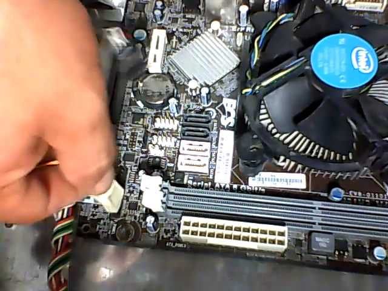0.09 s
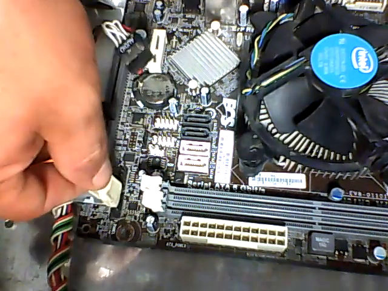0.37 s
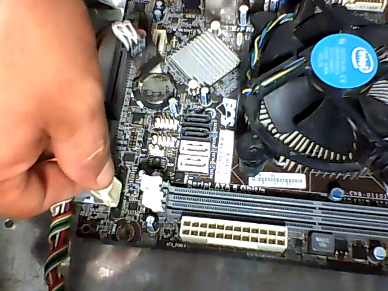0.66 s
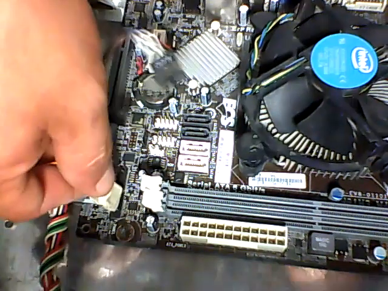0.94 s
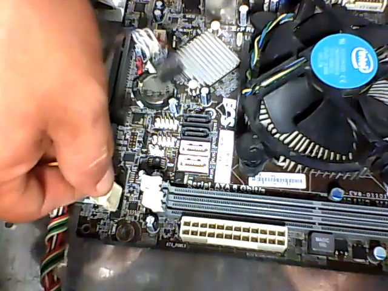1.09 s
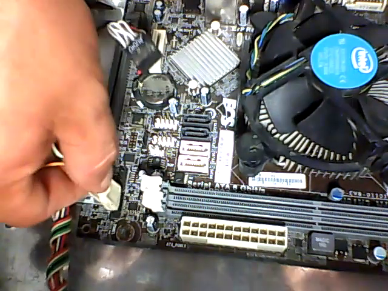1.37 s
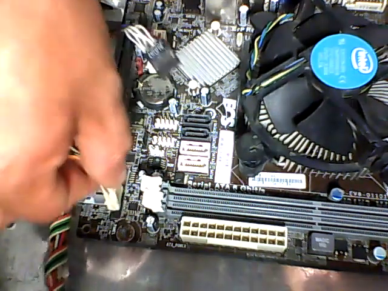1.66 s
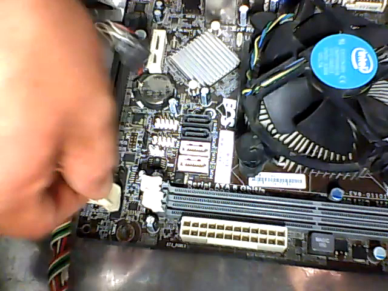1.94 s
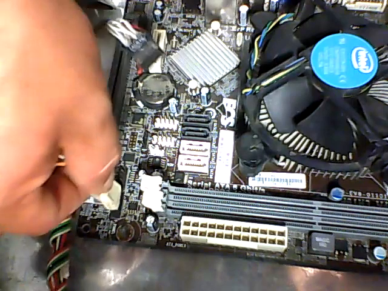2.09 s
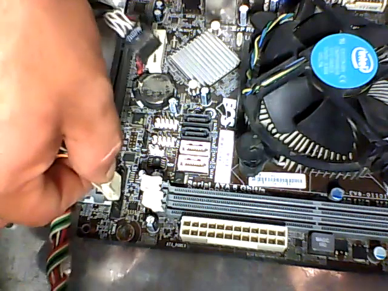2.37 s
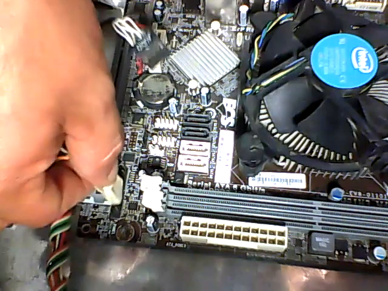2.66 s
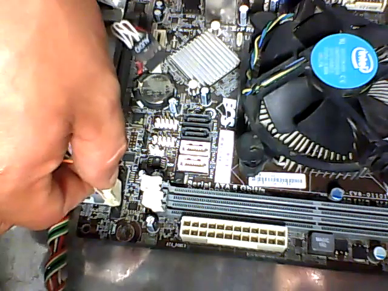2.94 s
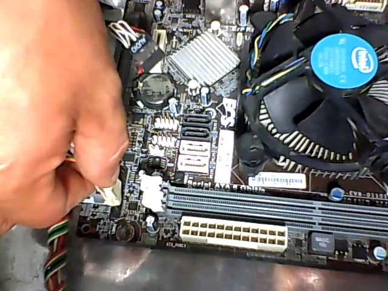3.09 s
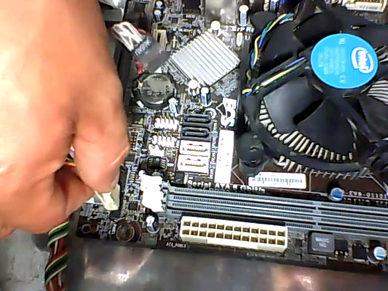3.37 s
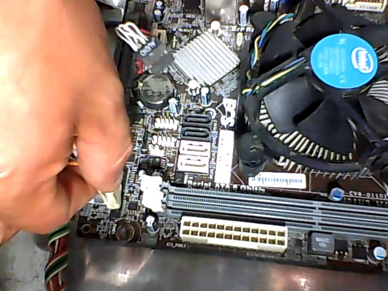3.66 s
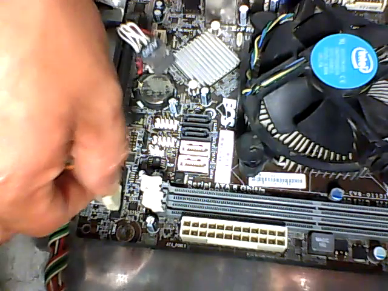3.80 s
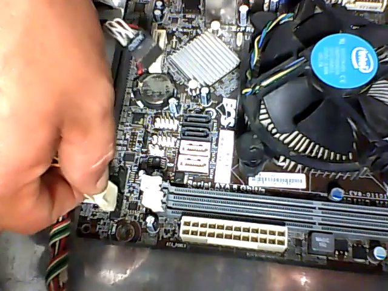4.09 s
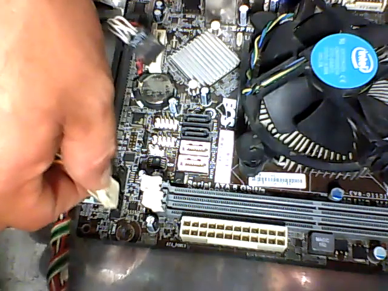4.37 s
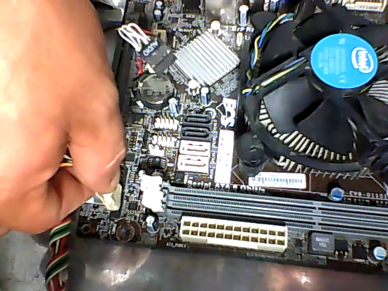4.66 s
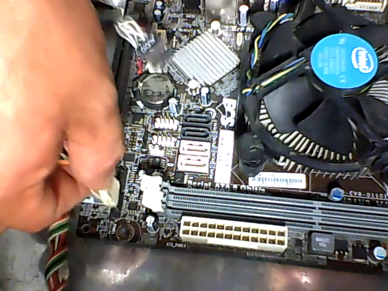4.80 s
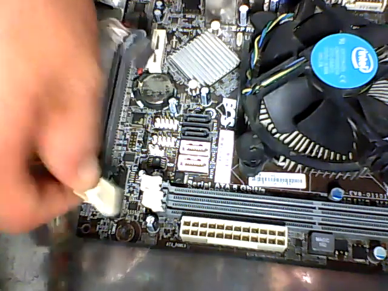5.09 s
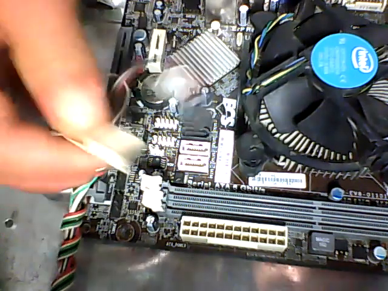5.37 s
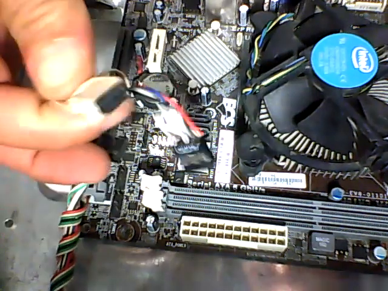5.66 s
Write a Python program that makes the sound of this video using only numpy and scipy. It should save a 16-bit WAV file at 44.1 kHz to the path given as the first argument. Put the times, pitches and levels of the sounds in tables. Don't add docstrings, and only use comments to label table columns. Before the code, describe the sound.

Very close, dry handling noise in a small room, through a cheap microphone. From start to end a thin pair of high electronic whines flutters rapidly, about fifteen pulses a second, with a low electrical buzz, soft hiss and dull building rumble. Small clicks and board taps open at 0 seconds; a sharper click with metallic ring and hollow knocks follows at 0.25-0.45. A light tick comes at 1.0, then a strong plasticky clack with low thud at 1.3 and little scrapes to 1.5. Isolated knocks sound at 2.06, 2.35, 2.65 and a double at 2.85; lighter ones at 3.3 and 3.6. The loudest clatter, bright and ringing, lands at 3.9-4.07, as a faint distant engine drone rises and stays. After a mostly quiet gap, clicks, knocks and dry wire rustles crowd together from 5.1 to 5.6, with heavier low rumble as the hand lifts.

```python
import sys
import numpy as np
from scipy import signal
from scipy.fft import rfft, irfft
from scipy.io import wavfile
from scipy.ndimage import uniform_filter1d

SR = 44100
rng = np.random.default_rng(int(sys.argv[2]) if len(sys.argv) > 2 else 0)


def to_linear_factor(level_db):
    exponent = np.asarray(level_db, float) / 20
    return 10 ** exponent


def to_wav(sig):
    pcm = np.clip(np.atleast_2d(sig), -1, 1) * 32767
    pcm = np.round(pcm).astype(np.int16)
    wavfile.write(sys.argv[1], SR, pcm.T)


N = 250223
TIME = np.arange(N) / SR


def band(x, lo_hz, hi_hz, order=2):
    return signal.sosfilt(signal.butter(order, [lo_hz, min(hi_hz, SR / 2.2)], "bandpass", fs=SR, output="sos"), x)


def unit(x):
    return x / np.sqrt(np.mean(x ** 2))


def loud(x):
    return x / np.sqrt(uniform_filter1d(x ** 2, 220).max())


def walk(rate):
    k = int(SR / rate)
    steps = np.repeat(rng.standard_normal(N // k + 1), k)
    return 1.363 * uniform_filter1d(uniform_filter1d(steps, k), k)[:N]


def hold(start_s, length_s, attack_s, release_s, sag_db):
    corners = np.cumsum([start_s - attack_s, attack_s, length_s, release_s])
    db = np.interp(TIME, corners, [-25, 0, sag_db, sag_db - 25])
    return to_linear_factor(db) * (db > min(sag_db, 0) - 25) * (TIME > start_s - attack_s)


def near_pitch(modes, hz, db_per_octave):
    return [(f, db - db_per_octave * abs(np.log2(f / hz)), t60) for f, db, t60 in modes]


def ring(modes, push, luck, scatter_db=1.5):
    t = np.arange(len(push)) / SR
    body = sum(to_linear_factor(db + scatter_db * g) * np.sin(2 * np.pi * hz * t) * 1000. ** (-t / t60)
               for (hz, db, t60), g in zip(modes, luck))
    return loud(signal.fftconvolve(body, push)[:len(push)])


def blows(table, sound):
    size = 8192
    t = np.arange(size) / SR
    out = np.zeros(N + size)
    for s, *row in table:
        i = int(s * SR)
        noise, luck = rng.standard_normal((3, size)), rng.standard_normal(12)
        out[i:i + size] += sound(t, noise, luck, *row)
    return out[:N]


# f/Hz, level/dB, t60/s
TRAY_MODES = [(4680, -6, .05), (4800, -4, .05), (4877, -1, .07), (4990, -2, .055), (5110, -3, .055),
              (5240, -4, .05), (5356, -2, .055), (5459, 0, .065), (5600, -4, .045), (6100, -4, .03),
              (6780, -3, .03), (6900, -4, .025)]


def click(t, noise, luck, plug_db, plug_hz, crack_db, tray_db, tray_hz):
    chatter = noise[0] * abs(noise[0]) ** .5 * (np.exp(-t / 0.0035) + 0.18 * np.exp(-t / 0.011))
    parts = noise[1] * (np.exp(-t / 0.0051) + 0.32 * np.exp(-t / 0.021))
    tray_push = noise[2] * (np.exp(-t / .003) + .3 * np.exp(-t / .018))
    plug_modes = [(plug_hz, 0, .014), (1.07 * plug_hz, -4, .012), (1.35 * plug_hz, -8, .008)]
    plug = ring(plug_modes, chatter, luck) + 0.97 * loud(band(parts, 1160, 4200))
    tray = ring(near_pitch(TRAY_MODES, tray_hz, 58), tray_push, luck) + 0.4 * loud(band(parts, 4000, 7000))
    crack = loud(band(chatter, 7500, 16500))
    return to_linear_factor(crack_db + 3) * crack + to_linear_factor(plug_db - 7.5) * loud(plug) + to_linear_factor(tray_db - 3.5) * loud(tray)


# t/s, plug level/dB, plug f/Hz, latch crack level/dB, tray ring level/dB
SEATINGS = [(0.0118, -33, 2770, -56, -57), (0.023, -46, 2630, -40, -58), (0.0661, -34, 2290, -55, -54),
            (0.2484, -25, 3880, -28.5, -29.5), (1.0102, -44, 3200, -48, -45), (1.306, -18, 1860, -28, -43),
            (1.3171, -33, 1700, -43, -51), (1.418, -31.5, 2100, -43, -53), (1.464, -36.5, 1710, -42, -53),
            (2.3434, -21, 2810, -27, -27), (2.8459, -31, 2630, -51, -46),
            (2.872, -23.5, 2230, -29.5, -26.5), (3.2975, -37.5, 4130, -33, -43),
            (3.5921, -23.5, 2500, -37.5, -38), (3.878, -35, 1730, -56, -57),
            (3.9696, -16, 2190, -31, -28.5), (4.0065, -32, 2570, -35, -27.5),
            (4.0134, -31, 2290, -33.5, -33), (5.243, -27.5, 2350, -38, -53), (5.322, -39, 2560, -44, -47),
            (5.4613, -40, 4380, -53, -44)]
GRAZES = [(0.2654, -21.5, 2070, -30, -29.5), (0.2744, -30, 2980, -50, -53), (0.4436, -35, 1640, -50, -53),
          (0.71, -49, 2230, -42, -55), (1.035, -35, 2550, -49, -44), (2.0625, -39, 2170, -57, -57),
          (2.6398, -39, 2280, -48, -35), (5.1545, -26, 1740, -33, -48), (5.2122, -40, 1600, -34, -52)]
TRAY_MIDDLE_HZ, TRAY_RIM_HZ = 4930, 6850


def plug_clicks():
    middle = [(*row, TRAY_MIDDLE_HZ) for row in SEATINGS]
    rim = [(*row, TRAY_RIM_HZ) for row in GRAZES]
    return blows(middle + rim, click)


# f/Hz, level/dB, t60/s
BOARD_MODES = [(740, -2, 0.13), (815, 5, 0.051), (886, -2.5, 0.072), (937, -8, 0.098), (999, 1, 0.14),
               (1069, 2.5, 0.1), (1117, 0, 0.084)]
# f/Hz, level/dB, t60/s
EDGE_MODES = [(1210, -6, 0.034), (1330, -1, 0.029), (1405, -5, 0.04), (1460, -3, 0.084)]


def knock(t, noise, luck, db, hz, contact_ms, thud_db, edge_db):
    swell = 1 - np.exp(-t * 1000 / max(contact_ms, .2))
    bounce = swell * (np.exp(-t / 0.0046) + 0.26 * np.exp(-t / 0.017))
    edge_push = noise[1] * (np.exp(-t / .0015) + .15 * np.exp(-t / .012))
    board = ring(near_pitch(BOARD_MODES, hz, 26), noise[0] * bounce, luck)
    body = loud(board + .5 * loud(band(noise[1] * bounce, 740, 1240)))
    edge = ring(EDGE_MODES, edge_push, luck)
    thud = loud(band(noise[2] * bounce ** 0.6, 232, 550))
    return to_linear_factor(db - 6.5) * body + to_linear_factor(edge_db - 4.5) * edge + to_linear_factor(thud_db - 5) * thud


# t/s, level/dB, strongest f/Hz, low thud level/dB
FLAT_KNOCKS = [(0.011, -30.5, 940, -40), (0.065, -40, 1010, -37.5), (0.249, -26.5, 790, -44),
               (0.266, -24, 940, -37), (0.277, -36, 991, -33), (0.365, -37, 996, -47),
               (0.443, -43, 921, -47), (0.453, -35, 970, -46), (1.034, -45, 1150, -50),
               (1.328, -28, 1020, -31), (2.344, -30, 1020, -49), (2.356, -35, 999, -34.5),
               (2.846, -39, 999, -40), (2.873, -31, 969, -36), (2.888, -30, 1040, -31.5),
               (2.974, -41, 1050, -47), (3.329, -43, 999, -58), (3.609, -41, 999, -43),
               (3.984, -26, 1040, -42), (4.005, -40, 1030, -40), (4.019, -28, 810, -37),
               (4.068, -32, 721, -44), (4.627, -43, 740, -53), (4.838, -36, 982, -51),
               (5.102, -34, 790, -40), (5.244, -31, 990, -37), (5.341, -32, 719, -46),
               (5.54, -40, 740, -43), (5.559, -37.5, 740, -39), (1.665, -41.5, 1120, -44)]
# t/s, level/dB, strongest f/Hz, edge clack level/dB, low thud level/dB
EDGE_KNOCKS = [(1.304, -25, 1010, -42, -30), (1.317, -27, 1000, -31, -29), (1.35, -27, 764, -41, -44),
               (1.4172, -30, 719, -34, -39), (1.794, -47, 719, -40, -45), (2.062, -27.5, 740, -33.5, -45),
               (2.638, -39, 875, -46, -50), (3.592, -35.5, 1000, -39, -55), (3.877, -34, 794, -30.5, -42),
               (3.969, -24.5, 990, -32, -39), (5.157, -34, 1180, -31, -41), (5.21, -33, 848, -33, -51),
               (5.369, -37, 1040, -40, -43)]
FLAT_CONTACT_MS, FLAT_EDGE_DB = 2.6, -12
EDGE_CONTACT_MS = 0.37


def board_knocks():
    flat = [(s, db, hz, FLAT_CONTACT_MS, thud_db, db + FLAT_EDGE_DB) for s, db, hz, thud_db in FLAT_KNOCKS]
    edge = [(s, db, hz, EDGE_CONTACT_MS, thud_db, edge_db) for s, db, hz, edge_db, thud_db in EDGE_KNOCKS]
    return blows(flat + edge, knock)


# t/s, length/s, wires level/dB, plug and board level/dB
RUSTLES = [(0.005, 0.037, -53, -38), (1.0, 0.037, -46, -54), (1.32, 0.032, -40.5, -43),
           (1.436, 0.048, -47, -48.5), (1.775, 0.036, -41.5, -50), (2.637, .015, -52, -53),
           (5.089, 0.028, -56, -45), (5.159, 0.037, -32, -35), (5.21, 0.043, -33, -41.5),
           (5.289, 0.033, -39, -46.5), (5.331, 0.073, -38, -39), (5.414, .025, -51, -47),
           (5.454, 0.065, -44, -45.5), (5.532, 0.014, -42, -42), (5.61, 0.04, -54, -55)]
DRAG_ATTACK_S, DRAG_RELEASE_S, DRAG_SAG_DB, DRAG_PLUG_DB = 0.013, 0.021, -2, -3.5


def rustle():
    gains = 0
    for s, length, wire_db, db in RUSTLES:
        drag = hold(s, length, DRAG_ATTACK_S, DRAG_RELEASE_S, DRAG_SAG_DB)
        gains = gains + drag * to_linear_factor(np.array([[wire_db], [db + DRAG_PLUG_DB], [db]]))
    patches_db = np.array([1.1 * walk(90), 3.6 * walk(70), 4.5 * walk(50)]) + 0.94 * walk(160)
    slips_db = 1.9 * rng.exponential(size=(3, N))
    slips = rng.standard_normal((3, N)) * to_linear_factor(slips_db + patches_db)
    bands_hz = [(7600, 14800), (2300, 6200), (400, 2500)]
    return sum(g * to_linear_factor(-3.5) * unit(band(x, *hz)) for g, x, hz in zip(gains, slips, bands_hz))


# t/s, length/s, f/Hz, level/dB, smear/Hz
SQUEAKS = [
    (0.487, 0.16, 10600, -60, 70),
    (3.8, .07, 3820, -64, 201),
    (4.137, .11, 4020, -60, 228),
]
SQUEAK_FADE_S, SQUEAK_ARCH = .02, .05


def squeaks():
    out = 0
    for s, length, hz, db, smear_hz in SQUEAKS:
        arch = 1 - SQUEAK_ARCH * np.clip(2 * (TIME - s) / length - 1, -2, 2) ** 2
        gain = hold(s, length, SQUEAK_FADE_S, SQUEAK_FADE_S, 0) * to_linear_factor(db + 3 + 3 * walk(150))
        out = out + gain * np.sin(2 * np.pi * np.cumsum(hz * arch + smear_hz * walk(400)) / SR)
    return out


# t/s, level/dB, swell/s
PUSHES = [(0.38, -39.5, 0.03), (1.27, -37.5, 0.15), (2.34, -49, .05), (2.64, -42, 0.021),
          (2.86, -36, 0.046), (3.52, -39, .06), (4.1, -46, 0.07), (5.13, -40, 0.035), (5.3, -40, 0.055)]
SHAKE_DB, SHAKE_SWELL_DB = -44, 2.5
LIFT_S, LIFT_RISE_S, LIFT_DB = 5.2, 0.18, -38.5


def shake():
    sway = 0
    for s, db, swell_s in PUSHES:
        u = np.maximum(TIME - s, 0) / swell_s
        sway = sway + (to_linear_factor(db) * u * np.exp(1 - u)) ** 2
    lean = (to_linear_factor(LIFT_DB) * np.clip((TIME - LIFT_S) / LIFT_RISE_S, 0, 1)) ** 2

    def rumble(lo_hz, hi_hz, lean_db):
        power = to_linear_factor(SHAKE_DB) ** 2 + sway + lean * to_linear_factor(lean_db) ** 2
        level = np.sqrt(power) * to_linear_factor(SHAKE_SWELL_DB * walk(5.97))
        return to_linear_factor(-5.5) * level * unit(band(rng.standard_normal(N), lo_hz, hi_hz))

    return rumble(22.3, 59.0, lean_db=6.5) + rumble(72.5, 276, lean_db=0.5)


# t/s, level/dB
ENGINE = [(3.8, -57), (4.0, -46.5), (4.08, -43), (4.3, -47.5), (4.58, -44), (4.9, -48), (5.05, -45),
          (5.15, -41.5), (5.67, -44)]
# multiple of the drone, level/dB
ENGINE_ORDERS = [(1, 0), (7 / 6, -11), (9 / 6, -9), (10 / 6, -14), (11 / 6, -14), (2, -14)]
ENGINE_HZ, ENGINE_RISE_HZ_PER_S = 163.1, 4.5


def engine():
    s, db = np.transpose(ENGINE)
    gate = uniform_filter1d(1. * ((TIME > s[0]) & (TIME < s[-1])), 600) + to_linear_factor(-99)
    hz = ENGINE_HZ + ENGINE_RISE_HZ_PER_S * (TIME - s[0])
    phase = 2 * np.pi * np.cumsum(hz * (1 + 0.011 * walk(12))) / SR
    drone = sum(to_linear_factor(order_db + 1.6 * walk(9)) * np.sin(k * phase) for k, order_db in ENGINE_ORDERS)
    return gate * to_linear_factor(np.interp(TIME, s, db) + 1.5) * drone


# f/Hz, level/dB per Hz
ROOM = [(53, -38), (90, -4), (114, -2), (603, -10.5), (872, -10), (1340, -13.5), (1700, -15), (1820, -13.5),
        (2460, -16.5), (6370, -20), (8080, -19), (10500, -19), (15800, -22)]
ROOM_DB = -46


def room_tone():
    hz, db = np.transpose(ROOM)
    f = np.maximum(np.arange(N // 2 + 1) * SR / N, 1)
    colour = to_linear_factor(np.interp(np.log(f), np.log(hz), db))
    hiss = irfft(rfft(rng.standard_normal(N)) * colour, N)
    return to_linear_factor(ROOM_DB + 0.44 * walk(3.18)) * unit(hiss)


# t/s into the frame, size
SUPPLY_STEPS = [(.0089, .021), (.0414, -.023), (.0496, .009)]
# f/Hz, t/s into the frame, level on/dB, level idle/dB
WHINES = [(8000, .0094, -37.5, -69), (14999.99, .0090, -38.6, -57)]
FRAME_HZ, READOUT_END_S = 15.001, .0413
MAINS_HZ, MAINS_START, MAINS_S, MAINS_DIP = 59.83, .964, .00078, .014


def camera_leak():
    into = TIME * FRAME_HZ % 1 / FRAME_HZ
    load = sum(size * (into > s) for s, size in SUPPLY_STEPS)
    load = load - sum(size for s, size in SUPPLY_STEPS) * into * FRAME_HZ
    load = load - MAINS_DIP * ((TIME * MAINS_HZ - MAINS_START) % 1 < MAINS_S * MAINS_HZ)
    sag = np.exp(-1 / (SR * .024))
    out = signal.lfilter([1, -1], [1, -sag], uniform_filter1d(load - load.mean(), size=13))
    for (hz, start, on_db, idle_db), ripple_db in zip(WHINES, [.2, .9]):
        on = uniform_filter1d(1. * ((into > start) & (into < READOUT_END_S)), size=9)
        pattern = np.interp(into, np.arange(80) / 1000, rng.standard_normal(80))
        gain = to_linear_factor(on_db + ripple_db * pattern) * on + to_linear_factor(idle_db) * (1 - on)
        out = out + gain * np.sin(2 * np.pi * hz * TIME)
    return out


ROOM_T60_S, ROOM_WET_DB = 0.27, -12.5


def room_tail(near):
    t = np.arange(20000) / SR
    tail = band(rng.standard_normal(len(t)), 300, 2600, order=1) * 1000. ** (-t / ROOM_T60_S) * (t > .004)
    return to_linear_factor(ROOM_WET_DB) * signal.fftconvolve(near, tail / np.sqrt(np.sum(tail ** 2)))[:N]


def scene():
    near = plug_clicks() + board_knocks() + rustle()
    return (near + room_tail(near) + squeaks() + shake() + engine() + room_tone())[None]


def band_limit(x):
    return signal.sosfilt(signal.butter(12, 17000, fs=SR, output="sos"), x)


def record(dry):
    x = np.tanh(2.5 * dry) / 2.5 + camera_leak()
    low = signal.sosfilt(signal.ellip(12, .1, 70, 15730, fs=SR, output="sos"), x)
    top = signal.sosfilt(signal.ellip(6, .1, 70, [15800, 16600], "bandpass", fs=SR, output="sos"), x)
    attack = uniform_filter1d(1. * (uniform_filter1d(top ** 2, 256) > to_linear_factor(-45) ** 2), 256)
    return band_limit(low + to_linear_factor(-18) * attack * top)


dry = scene()
out = record(dry)
to_wav(out)
```